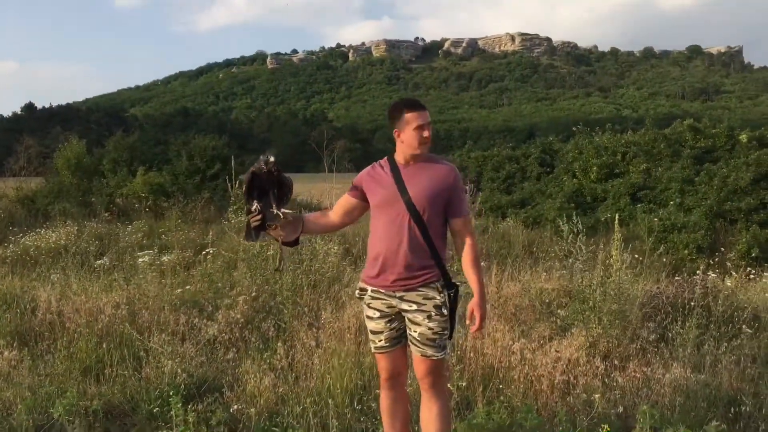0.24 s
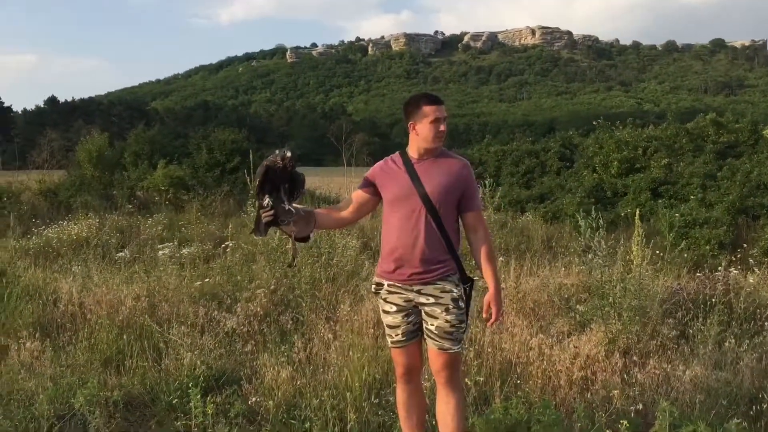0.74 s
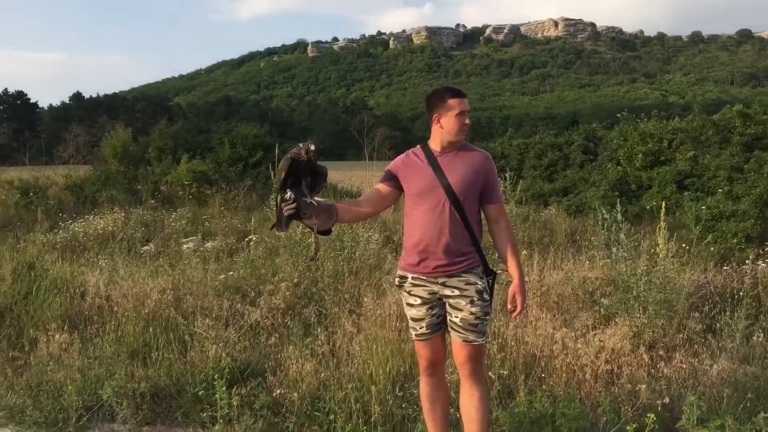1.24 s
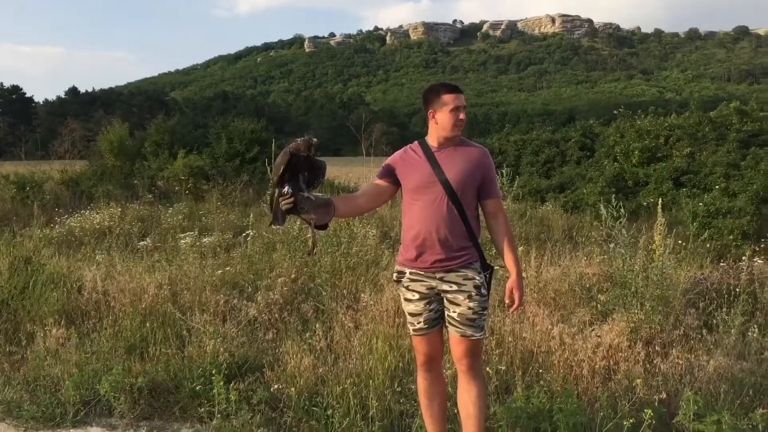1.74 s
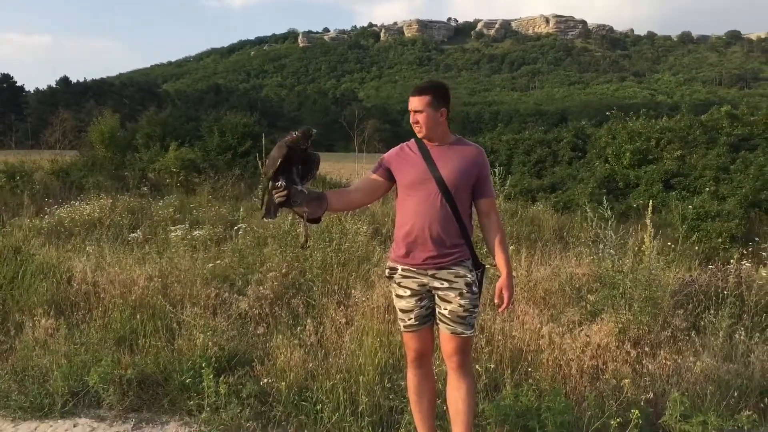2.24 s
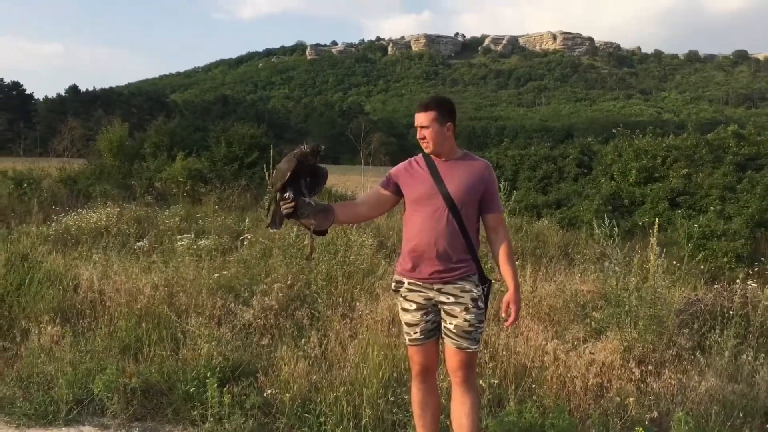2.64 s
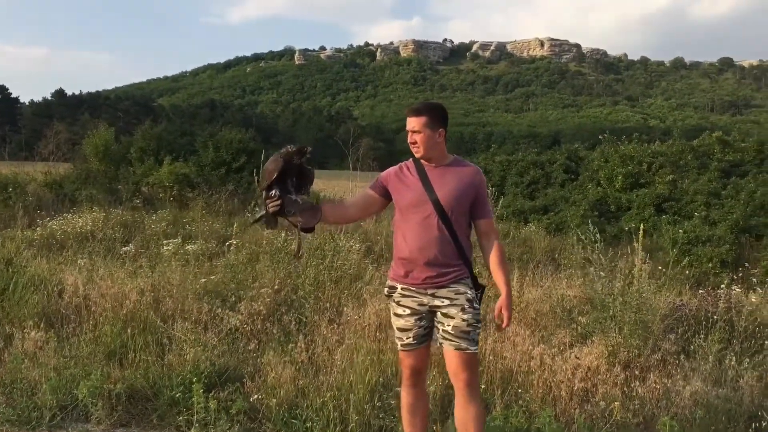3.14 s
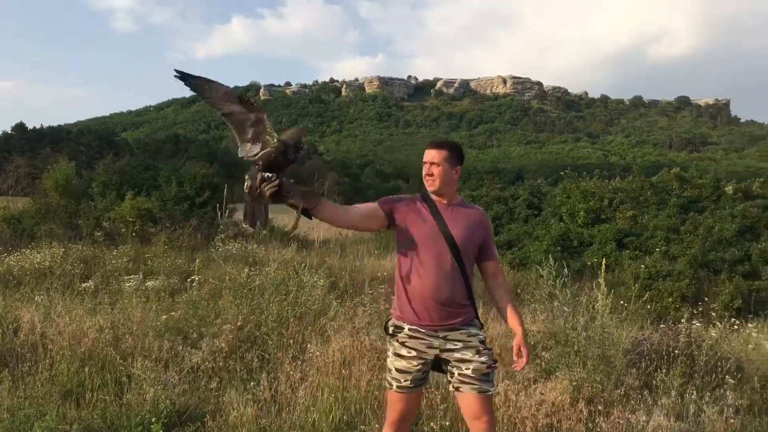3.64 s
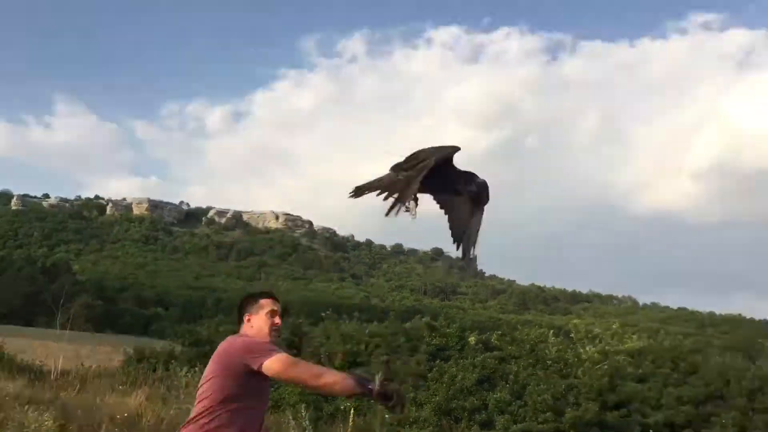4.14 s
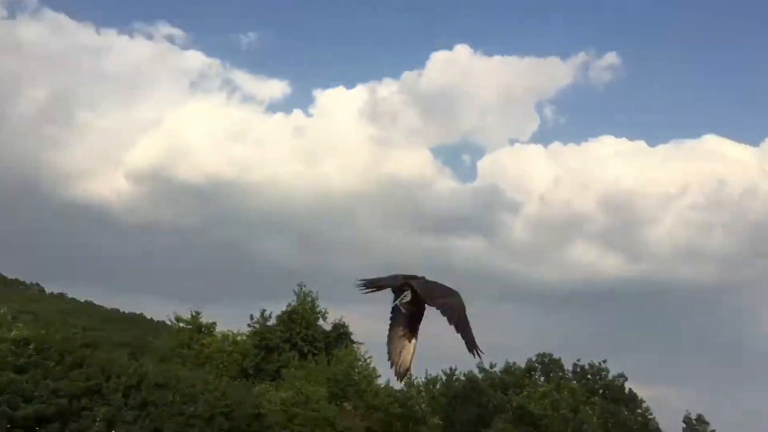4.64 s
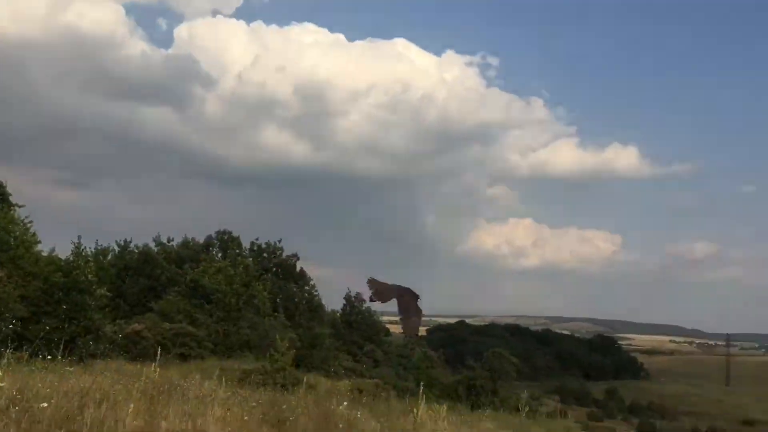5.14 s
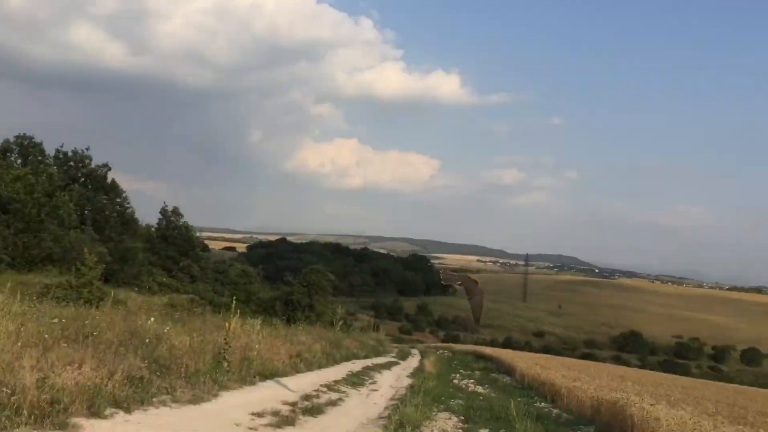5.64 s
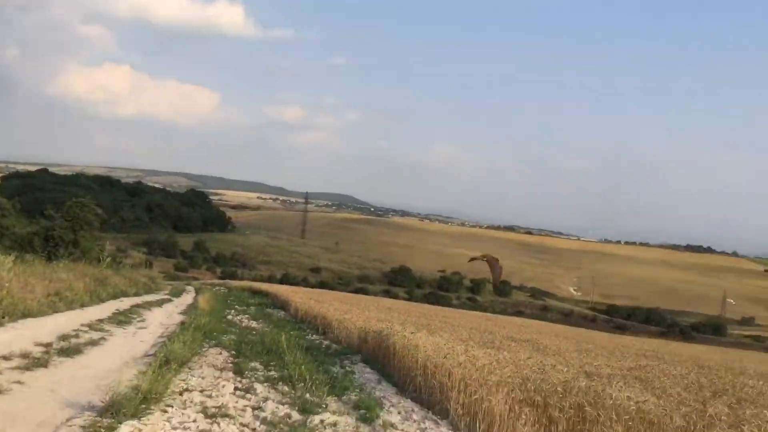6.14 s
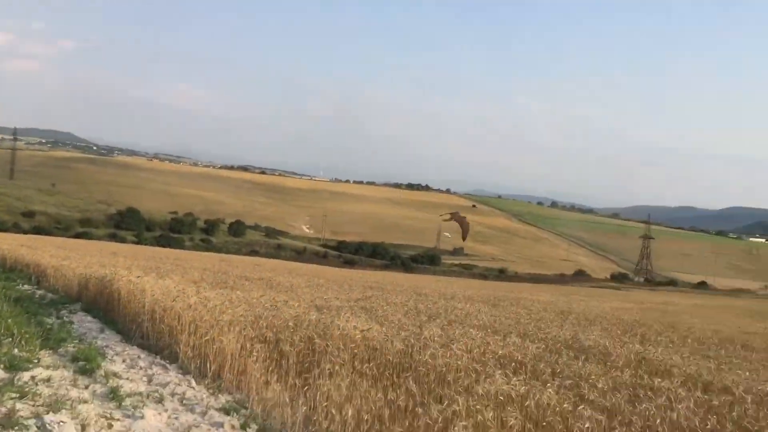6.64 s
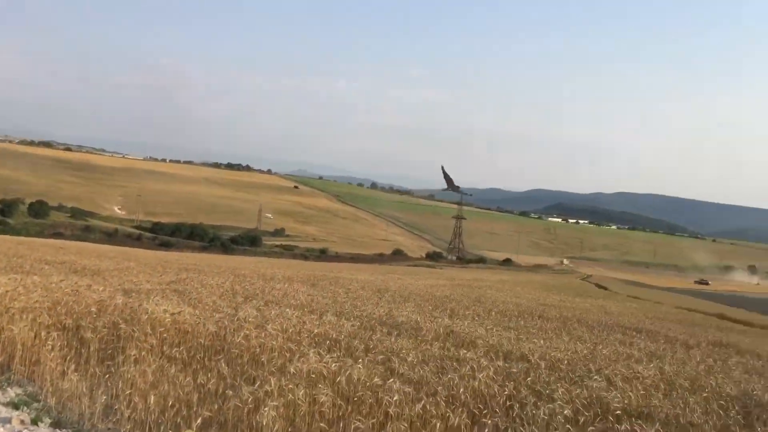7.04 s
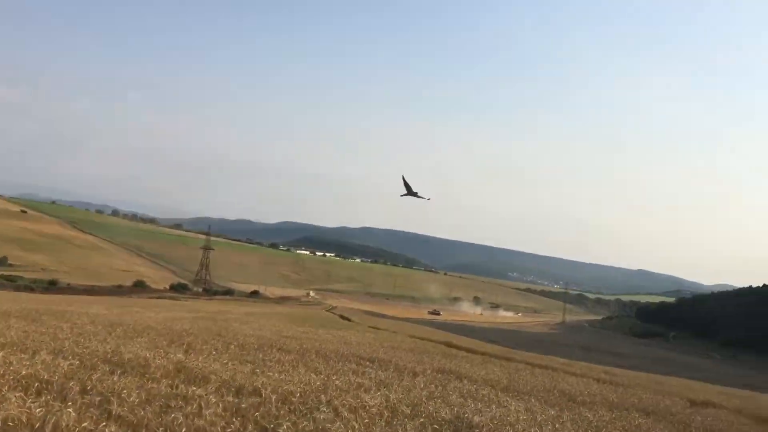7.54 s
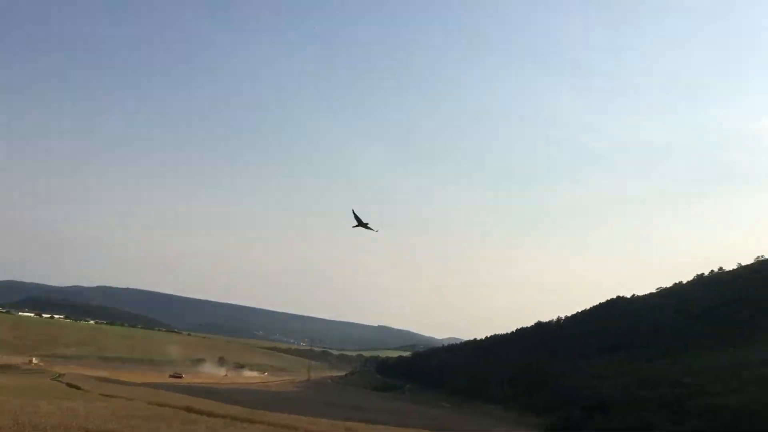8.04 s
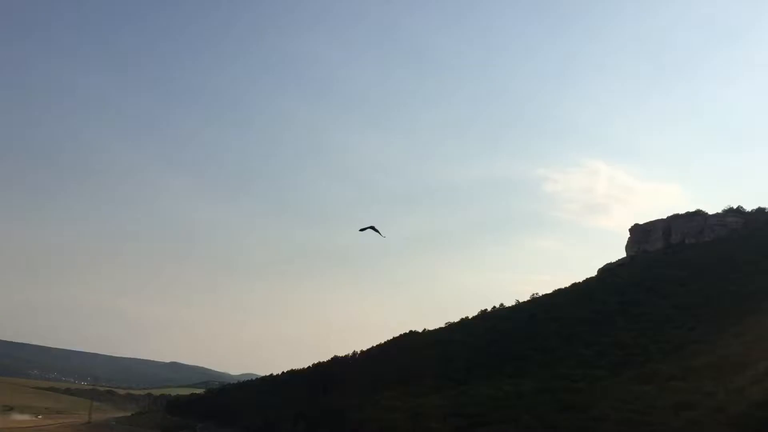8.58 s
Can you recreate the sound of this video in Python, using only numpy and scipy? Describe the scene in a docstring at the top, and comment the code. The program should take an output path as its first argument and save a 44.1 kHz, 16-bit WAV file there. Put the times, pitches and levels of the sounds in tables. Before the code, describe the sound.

A mono handheld microphone in an open grassy field. From 0 to 2.3 s it is quiet: faint air, soft wind puffs and low thumps, with tiny bird chirps around 0.4 and 1.8 s. At 2.3 s a young falcon on the glove gives a weak, rising reedy wail, then short begging cries about every 0.3 s, louder and rougher. Between 3.5 and 4.7 s they flutter and crack into piercing squeals and rasping screams. Takeoff around 4 s brings a sharp dry click and feathery brushes. The cries pass by and run until 5.9 s, with a faint scattered echo from scrub; one distant cry follows at 6.8 s. Wind rumbles strongly from 4.6 s, thumping hardest around 6.5 to 7.3 s, then eases. Sparse clicks get softer, a tiny chirp sounds at 7.9 s, and dry stalk hiss and a far harvester's low drone remain until 8.8 s.

```python
"""A young falcon begs from a falconer's glove in an open field, takes off past the microphone and flies away.
Its voice is a stack of harmonics: reedy wails, most of them rising, that flutter, break into squeals and turn
to rasping screams. Scrub answers with a faint echo, made of fading noise.
Wind is rumbling noise and short pressure kicks. Clicks and brushes of wings and dry grass are bursts of noise.
Small birds are gliding tones; a far harvester is noise with a low, unsteady drone, over hissing stalks and air."""
import sys
import numpy as np
from scipy import signal
from scipy.fft import rfft, irfft
from scipy.io import wavfile

SR = 44100
rng = np.random.default_rng(int(sys.argv[2]) if len(sys.argv) > 2 else 0)


def wrap_up_sound(samples):
    """Save the sound to the file named by the first command line argument, as 16-bit audio."""
    columns = np.atleast_2d(samples).T
    # keep every value between -1 and 1, then stretch to whole-number steps
    tamed = np.clip(columns, -1, 1)
    steps = np.round(tamed * 32767).astype(np.int16)
    wavfile.write(sys.argv[1], SR, steps)


N = 388521
T = np.arange(N) / SR  # time of every sample, s

# Calls: most rise to the break and some fall to it; there the voice turns harder and rougher, then droops.
# (start t/s, break t/s, end t/s, opening f/Hz, break f/Hz [before the small drop there], closing f/Hz,
#  droop power [1 straight, more is later], opening level/dB, pushed level/dB,
#  then levels against the second harmonic: fundamental level/dB, third harmonic level/dB,
#  upper harmonics level/dB; attack t/s, release t/s, opening rasp [0-1], closing rasp [0-1], flutter [0-1])
CALLS = [ (2.341, 2.71, 2.762, 900, 1186, 985, 3.7, -41, -39.5, 0.5, 5, -5, 0.063, 0.023, 0.015, 0.24, .15),
         (2.85, 2.979, 3.093, 1106, 1192, 1064, 5.6, -34, -24.5, -12, -4, -6, 0.0081, 0.02, 0.026, 0.051, 0.08),
         (3.181, 3.271, 3.415, 1134, 1194, 1145, 5, -38.5, -22, -8, -5, -6.5, 0.012, 0.029, 0.06, .15, 0.63),
         (3.503, 3.666, 3.724, 1225, 1271, 1123, 2.16, -34.5, -23.5, -2.5, -1, -9.5, 0.026, 0.021, 0.22, 0.54, 0.79),
         (3.879, 3.984, 4.062, 1340, 1528, 1167, 0.87, -27.5, -23, -1.5, 1.5, -5, 0.011, .055, 0.78, 0.74, 1),
         (4.159, 4.255, 4.299, 1485, 1385, 1118, 0.98, -25, -20.5, -7, -2.5, -7.5, 0.029, 0.019, 0.85, 0.42, .7),
         (4.464, 4.527, 4.584, 1289, 1252, 1084, 1.3, -28, -26, -8, -7, -11.5, 0.006, 0.049, 0.42, 1, 1),
         (4.661, 4.761, 4.836, 1112, 1200, 1124, 2.5, -36.5, -21.5, -4, -1.5, -6, 0.031, 0.06, 0.5, 0.22, 0.69),
         (4.901, 5.014, 5.104, 1153, 1193, 1047, 4.7, -30, -18, -6, -6.5, -8, .035, 0.1, 0.066, 0.58, 0.92),
         (5.192, 5.246, 5.364, 1127, 1220, 1060, 7.4, -38.5, -25, -5, -6.5, -10.5, 0.028, 0.041, 0.25, 0.15, 0.39),
         (5.441, 5.562, 5.618, 1152, 1221, 1124, 2.35, -28.5, -25, -12, -8.5, -7.5, 0.049, .06, 0.1, 0.885, 0.99),
         (5.769, 5.791, 5.890, 1250, 1223, 1049, 2.63, -38, -33, -3.5, -5, -6, 0.013, 0.057, 0.27, 0.39, 0.87),
         (6.768, 6.831, 6.920, 1159, 1188, 1052, 1.2, -50.5, -39.5, -9.5, -1.5, -5.5, 0.023, 0.073, 0.39, 0.33, .3),
         ]
# Moments when the voice breaks into a whistle.
# (start t/s, length t/s, opening f/Hz, middle f/Hz, closing f/Hz,
#  opening level/dB, closing level/dB [both before the squeal trim], rasp [0-1])
SQUEAL_NOTES = [ (3.566, 0.065, 3720, 3543, 3486, -19, -18, 0.2),
                (3.616, .064, 2980, 2715, 2446, -16, -22, .3),
                (3.862, 0.02, 4000, 3810, 3740, -31.5, -31.5, 0.7),
                (3.876, 0.08, 3660, 3596, 3700, -16, -23, 0.24),
                (3.880, 0.093, 2760, 2793, 3137, -30, -19, 0.52),
                (3.953, 0.059, 3740, 3780, 3100, -22.5, -16, 0.73),
                (4.173, .032, 3950, 3703, 3490, -27, -18, 0.66),
                (4.199, 0.059, 2910, 2848, 2780, -9, -25.5, .25),
                (4.425, 0.071, 5110, 4730, 4570, -35.5, -30, 0.33),
                (4.465, 0.063, 2628, 2523, 2510, -23, -24, 0.43),
                (4.467, 0.056, 3170, 3247, 3340, -24, -19.5, .2),
                (4.696, 0.066, 3330, 3320, 3160, -25, -21.5, 0.22), ]


def falcon(squeal_trim_db=-1, cutoff_hz=800):
    """All the calls, with their breaks; little sounds below the cutoff."""
    out = np.zeros(N)
    for call in CALLS:
        add(out, call[0], wail(call))
    for note in SQUEAL_NOTES:
        add(out, note[0], undb(squeal_trim_db) * squeal(note))
    return high_pass(out, cutoff_hz, order=5)


AWAY_S = 4.3, 4.8  # the bird passes the microphone and shows its back between these times
APPROACH_POWER = 1.2  # the pitch eases towards the break
SCOOP, SCOOP_S = .07, .014  # share of the pitch missing at the start, and how fast it is made up
BREAK_DROP, BREAK_S = .017, .008  # share of the pitch lost at the break, and how long the break takes
BREAK_SHARE = 0.41  # this share of the change in rasp and flutter sets in at the break itself
ATTACK_DB, RELEASE_DB = 18.5, 25  # a call starts and ends this far down
ACCENT_DB, ACCENT_S = 5.5, 0.021  # a call opens with a short burst of pressure
# the push starts before the break, jumps at it (more in a rough call), is full this far into the droop
SWELL_LEAD_S, SWELL_JUMP, SWELL_SHARE = .025, 0.16, .45
FUNDAMENTAL_GROWTH = 0.6  # dB gained by the fundamental per dB of push
LATE_PUSH_DB = 5  # extra second harmonic after the break in a fully rasping voice
THROAT_DAMP = .6  # rasp smears the throat's resonances: share of their depth lost at full rasp
WAVER_DB, WAVER_HZ = 2, 18  # the second harmonic wavers once the bird is in flight
OPEN_DB, OPEN_S = 10, .045  # upper harmonics start up to this much weaker (less in a rough call), then catch up
START_BRIGHT_DB, PUSH_BRIGHT_DB, AWAY_DULL_DB = 0.6, 0.22, 1.6  # tilt of the upper harmonics, dB per kHz
# How far the three lowest harmonics give way while the voice squeals.
# (fundamental level/dB, second harmonic level/dB, third harmonic level/dB)
SQUEAL_DUCKING = (-19.5, -7.5, -13.5)
# Resonances of the throat, acting on the three lowest harmonics. (f/Hz, level/dB)
THROAT_COLOUR = [(800, 1), (980, 4.5), (1130, 1), (1300, 0.5), (1650, -2.5), (1850, -4.5), (2090, -11),
                 (2190, -11), (2265, 3.5), (2345, 5.5), (2450, 0), (2560, 2.5), (2680, 8.5), (2900, -14.5),
                 (3080, -20.5), (3240, -8), (3360, 7), (3450, 3), (3530, -7), (3700, -0.5), (4600, -13)]


def wail(call):
    """One call: the pitch scoops in, glides to the break and droops as the bird pushes and its voice roughens."""
    (start, crack, end, open_hz, break_hz, close_hz, droop, open_db, push_db,
     fundamental_db, third_db, upper_db, attack, release, open_rasp, close_rasp, flutter) = call
    t, gate = span(start, end - start, 0.0081)
    early = ramp(t, start, crack)
    late = ramp(t, crack, end)
    broken = ramp(t, crack, crack + BREAK_S)
    away = ramp(t, *AWAY_S)

    # pitch
    hz = break_hz + (open_hz - break_hz) * (1 - early) ** APPROACH_POWER
    hz = hz + (close_hz - break_hz) * late ** droop
    hz = hz * (1 - SCOOP * np.exp((start - t) / SCOOP_S) - BREAK_DROP * broken)

    # loudness: attack, hold, release, opening burst and swell
    held_db = open_db - ATTACK_DB * (1 - ramp(t, start, start + attack))
    held_db = held_db - RELEASE_DB * ramp(t, end - release, end) ** 1.4
    held_db = held_db + ACCENT_DB * np.exp((start - t) / ACCENT_S)
    jump = min(SWELL_JUMP + open_rasp, 1)
    swell = ramp(t, crack - SWELL_LEAD_S, crack + SWELL_SHARE * (end - crack))
    swell_db = (push_db - open_db) * (jump * broken + (1 - jump) * swell)
    pushed_db = held_db + swell_db

    # roughness
    strain = BREAK_SHARE * broken + (1 - BREAK_SHARE) * late
    rasp = open_rasp + (close_rasp - open_rasp) * strain

    # the throat shapes the three low harmonics
    source_db = [held_db + fundamental_db + FUNDAMENTAL_GROWTH * swell_db,
                 pushed_db + LATE_PUSH_DB * rasp * broken,
                 pushed_db + third_db]
    whistle = squealing(t)
    depth = 1 - THROAT_DAMP * rasp
    low_sizes = []
    for k, (db, duck_db) in enumerate(zip(source_db, SQUEAL_DUCKING), 1):
        low_sizes.append(undb(db + duck_db * whistle) * colour(THROAT_COLOUR, k * hz) ** depth)
    low_sizes[1] = low_sizes[1] * undb(WAVER_DB * away * wobble(t, WAVER_HZ))

    # the upper harmonics open up with effort
    closed_db = OPEN_DB * (1 - open_rasp) * np.exp((start - t) / OPEN_S)
    upper_size = undb(pushed_db + upper_db - closed_db)
    dull_db = AWAY_DULL_DB * away - START_BRIGHT_DB * (1 - early) - PUSH_BRIGHT_DB * early
    return gate * syrinx(t, hz, low_sizes, upper_size, dull_db, rasp, flutter * np.maximum(strain, open_rasp))


# Colour of the upper harmonics in the open beak. (f/Hz, level/dB)
BEAK_COLOUR = [(4000, 15.5), (4700, -5), (5800, 0), (7000, -15.5), (8200, -17), (9300, -21), (10500, -26.5),
               (12000, -26.5), (14000, -29.5), (16000, -37.5)]


def syrinx(t, hz, low_sizes, upper_size, dull_db, rasp, flutter, flutter_hz=190, jitter=0.046,
           scatter=0.12, shimmer_db=6, hiss_db=-11):
    """The bird's voice organ buzzes in harmonics; strain adds a slow second vibration and random unevenness."""
    # the second vibration speeds up and stumbles as the voice tears
    speed_up = rasp ** 2 * (1 + .5 * wobble(t, 90))
    beat = turn(flutter_hz * (1 + speed_up + 0.046 * wobble(t, 55)))
    uneven_hz = hz * (1 + jitter * rasp * wobble(t, 160) + 0.03 * rasp * wobble(t, 30))
    phase = turn(uneven_hz) + scatter * rasp * wobble(t, 490) + 0.27 * flutter * np.sin(beat)

    harmonics = []
    for k in range(1, 16):
        shimmer = undb(shimmer_db * rasp * (np.tanh(wobble(t, 150)) - rasp / 4))
        harmonics.append(np.sin(k * phase) * shimmer * (k * hz < SR / 2))
    low = sum(size * h for size, h in zip(low_sizes, harmonics))

    # the beak colours the upper harmonics; each wavers in strength by chance, and all tilt by dull_db per kHz
    gains = []
    for k in range(4, 16):
        gains.append(colour(BEAK_COLOUR, k * hz) * undb(3.9 * wobble(t, 23) - dull_db * k * hz / 1000))
    gains = np.array(gains)
    upper = np.sum(gains * harmonics[3:], axis=0) / np.sqrt(np.sum(gains ** 2, axis=0))

    # air hisses through the membranes once a cycle
    breath = resonate(resonate(rng.standard_normal(len(t)), 5200, 0.98), 5200, 0.98)
    hiss = unit(breath) * (1 + 0.95 * np.cos(phase))
    voice = low + upper_size * (upper + undb(hiss_db) * rasp * hiss)
    return np.sqrt(2) * voice * (1 + 0.38 * flutter * np.sin(beat))


SQUEAL_EDGE_S = 0.0064  # fade at each end of a squeal


def squeal(note, jitter=0.038, shimmer=0.86, octave_db=-21, twelfth_db=-31):
    """The voice breaks into a high, gliding, nearly pure whistle, which tears under strain."""
    start, length, *pitches, open_db, close_db, rasp = note
    t, gate = span(start, length, SQUEAL_EDGE_S)
    db = np.linspace(open_db, close_db, len(t))
    phase = turn(arc(t, pitches) * (1 + jitter * rasp * wobble(t, 140)))
    tone = np.sin(phase)
    tone = tone + undb(octave_db + 5.2 * wobble(t, 60.3)) * np.sin(2 * phase)
    tone = tone + undb(twelfth_db) * np.sin(3 * phase)
    return np.sqrt(2) * gate * undb(db) * tone * (1 + shimmer * rasp * wobble(t, 420))


def squealing(t):
    """1 while the voice is broken into a whistle, else 0, with short slopes between."""
    on = 0
    for start, length, *_ in SQUEAL_NOTES:
        end = start + length
        on = on + ramp(t, start - SQUEAL_EDGE_S, start) - ramp(t, end, end + SQUEAL_EDGE_S)
    return np.minimum(on, 1)


def scrub(x, near_db=-37, far_db=-26, ground_db=-17, t60=.55):
    """Rough ground scatters a quick echo and bushes a longer one; their share grows as the bird leaves."""
    t = T[:SR]
    # t60: seconds for the bushes' echo to fade by 60 dB
    bushes = resonate(rng.standard_normal(len(t)), 3000, 0.72) * undb(-60 * t / t60) * np.minimum(t / 0.04, 1)
    ground = rng.standard_normal(len(t)) * t * np.exp(-t / 0.006)
    # ground_db is reached when the bird is far
    echo = (unit(bushes) + undb(ground_db - far_db) * unit(ground)) / np.sqrt(len(t))
    share_db = np.interp(T, [4.2, 5.6], [near_db, far_db])
    return signal.fftconvolve(x * undb(share_db), echo)[:N]


# Steady wind on the microphone, stronger once it swings after the bird. (t/s, level/dB before the wind trim)
WIND_STRENGTH = [(0, -61.5), (.4, -48.5), (.85, -54), (1.0, -45.5), (1.95, -44), (2.2, -62.5),
                 (2.45, -48.5), (3.1, -56), (4.1, -46), (4.58, -22), (4.9, -32.5), (5.25, -26.5),
                 (5.75, -30.5), (6.05, -39.5), (6.45, -34.5), (6.56, -23.5), (7.22, -26.5), (7.7, -33.5),
                 (8.2, -42), (8.8, -39.5)]
# Colour of the wind's rumble. (f/Hz, level/dB)
RUMBLE_COLOUR = [(15, -47), (25, -15.5), (45, 4.5), (64, 6), (140, -4.5), (286, -25), (489, -33.5),
                 (800, -43.5), (1040, -78.5), (1760, -120)]
# Single gusts. (middle t/s, level/dB before the wind trim, width t/s [standard deviation])
SINGLE_GUSTS = [(0.273, -27, 0.018), (0.631, -33.5, 0.041), (1.318, -27, 0.0067), (1.573, -23.5, 0.023),
                (1.829, -27, 0.02), (2.623, -30, 0.041), (3.212, -37, 0.0096)]
PORT_HZ = 47  # wind sounds are weakened below this


def wind(trim_db=-3, churn_db=3.0, eddy_db=-3, eddy_hz=104, size_db=4.5):
    """Churning rumble and a stream of small eddies (swirls of air) follow the strength of the wind."""
    steady_db, = curves(WIND_STRENGTH, T)
    force = undb(steady_db)
    for s, db, width in SINGLE_GUSTS:
        force = force + undb(db) * np.exp(-.5 * ((T - s) / width) ** 2)
    eddies = np.zeros(N)
    for s, pitch, size in rng.random((350, 3)):
        # random time, a pitch within an octave either way, and few large sizes
        gain = undb(size_db * min(-np.log(size), 3))
        add(eddies, s * T[-1], gain * eddy(eddy_hz * 2 ** (2 * pitch - 1)))
    rumble = unit(noise(RUMBLE_COLOUR) * undb(churn_db * wobble(T, 25)))
    out = undb(trim_db) * force * (rumble + undb(eddy_db) * unit(eddies))
    return high_pass(out, PORT_HZ, order=3)


# Large single eddies that thump the microphone. (t/s, level/dB before trim, f/Hz [the kick glides around it])
THUMPS = [(0.272, -31, 89), (0.599, -18.5, 138), (1.298, -20.5, 69), (1.553, -13, 82.6),
          (1.801, -21.5, 109), (1.827, -16.5, 159), (1.872, -14.5, 111), (2.652, -14, 107),
          (4.799, -15.5, 192), (5.192, -11.5, 76), (5.801, -17.5, 102), (6.531, -13.5, 167.3),
          (6.545, -10.5, 74.3), (6.786, -14.5, 71.5), (6.859, -14.5, 141), (7.111, -25, 162),
          (7.24, -15, 95), (7.284, -13.5, 167)]


def buffets(trim_db=-1):
    """Each large eddy thumps the microphone's diaphragm with one pressure kick."""
    out = np.zeros(N)
    for s, db, hz in THUMPS:
        add(out, s, undb(db + trim_db) * eddy(hz))
    return high_pass(out, PORT_HZ, order=3)


def eddy(hz, cycles=0.46, softness=1.5):
    """The pressure kick of one eddy, slowing as it passes."""
    age = T[:SR // 10] * hz / cycles
    swing = np.sin(turn(hz * (0.48 + 1.785 * np.exp(-age))))
    return swing * (age * np.exp(1 - age)) ** softness


# Brushes of feathers and grass. (middle t/s, length t/s, level/dB before the fades, centre f/Hz)
BRUSHES = [(3.791, 0.02, -42.5, 1890), (4.083, 0.091, -48, 2100), (4.127, 0.03, -41.5, 1870),
           (4.348, 0.23, -49.5, 1800), (6.21, 0.44, -65, 14030), (6.239, 0.15, -54, 1900),
           (6.305, 0.0091, -48.5, 10000), (6.325, 0.13, -63.5, 2455), (6.904, 0.053, -47, 2080),
           (7.391, 0.053, -60.5, 2190), (8.016, 0.058, -59, 2500), (8.572, .12, -70, 3250)]


def rustles(q=1.06, grain_db=4):
    """Wings and dry grass brush along: grainy noise through two broad resonances, faded in and out."""
    out = np.zeros(N)
    for s, length, db, hz in BRUSHES:
        t = T[:int(length * SR)]
        grains = rng.standard_normal(len(t)) * undb(grain_db * wobble(t, 350))
        brush = unit(resonate(resonate(grains, hz, q), hz, q))
        add(out, s - length / 2, undb(db) * brush * np.hanning(len(t)))
    return out


# Dry clicks of tackle and stalks. (t/s, peak level/dB, f/Hz)
DRY_CLICKS = [(3.787, -50, 2460), (4.0479, -20, 2210), (4.33, -30.5, 2490), (4.399, -29, 2570),
              (5.3898, -35.5, 2380), (5.421, -36.5, 2320), (5.8911, -31, 2130), (6.194, -34, 2140),
              (6.9485, -44, 1770), (6.994, -37, 2880), (7.3752, -46.5, 1560), (7.43, -45, 2360),
              (7.4767, -41, 3100), (7.9804, -48.5, 1660), (8.519, -50.5, 3400), (8.547, -47.5, 3170),
              (8.6273, -48, 1760)]


def clicks(q=3.1, t60=.025):
    """A click is a fast-fading burst of noise through one resonance; the burst drops 60 dB in t60 seconds."""
    out = np.zeros(N)
    t = T[:SR // 20]
    for s, db, hz in DRY_CLICKS:
        snap = resonate(rng.standard_normal(len(t)) * undb(-60 * t / t60), hz, q)
        add(out, s, undb(db) * snap / np.abs(snap).max())
    return out


# Calls of small birds. (t/s, length t/s, opening f/Hz, middle f/Hz, closing f/Hz, peak level/dB)
SMALL_BIRDS = [(.348, .05, 3600, 4100, 3780, -55.5), (.349, 0.036, 3220, 2180, 1720, -60.5),
               (0.517, 0.057, 2780, 2080, 1700, -64), (1.805, 0.039, 3120, 2550, 2030, -61),
               (7.852, 0.029, 4850, 5090, 5230, -52.5)]


def chirps():
    """Each small bird's chirp is one gliding, slightly unsteady tone that swells and fades."""
    out = np.zeros(N)
    for s, length, *pitches, db in SMALL_BIRDS:
        t, gate = span(s, length, length / 2)
        hz = arc(t, pitches) * (1 + 0.014 * wobble(t, 300))
        add(out, s, undb(db) * gate * np.sin(turn(hz)))
    return out


# Loudness of the far harvester's noise, before its small wavering. (t/s, level/dB)
HARVESTER_LEVEL = [(0, -80.5), (5.5, -66.5), (6.8, -65), (7.5, -59.5), (8.1, -56.5), (8.8, -58)]
# Colour of the harvester's noise. (f/Hz, level/dB)
MACHINE_COLOUR = [(150, -44), (250, -14.5), (333, -0.5), (440, -4), (623, 5.5), (680, 1.5), (831, -2),
                  (946, -17), (2000, -45.5), (2600, -56), (4400, -120)]


def harvester(engine_hz=315, engine_db=-13):
    """A far machine: coloured noise plus an unsteady engine tone and its octave."""
    level_db, = curves(HARVESTER_LEVEL, T)
    phase = turn(engine_hz * (1 + 0.013 * wobble(T, 1.8)))
    drone = (np.sin(phase) + np.sin(2 * phase)) * undb(engine_db + 4.1 * wobble(T, 6.6))
    return undb(level_db + wobble(T, 6)) * (noise(MACHINE_COLOUR) + drone)


# Hiss of the dry field, before its small wavering. (t/s, level/dB)
FIELD_LEVEL = [(0, -74.5), (3.5, -72), (5, -62.5), (6.5, -65), (7.9, -64), (8.8, -65.5)]
# Colour of that hiss. (f/Hz, level/dB)
STALK_COLOUR = [(900, 10), (2000, 2), (4000, -7.5), (7000, -10.5), (10500, -8), (13000, -5), (15500, -4)]


def dry_field():
    """Dry stalks hiss: noise whose level wavers a little."""
    level_db, = curves(FIELD_LEVEL, T)
    return undb(level_db + 0.8 * wobble(T, 12)) * noise(STALK_COLOUR)


# Colour of the still air. (f/Hz, level/dB)
AIR_COLOUR = [(120, -22.5), (200, -19.5), (321, 6), (414, -5), (677, -15), (1030, -22), (2250, -16),
              (4920, -22.5), (6130, -21), (14200, -34), (15500, -29.5)]


def still_air(level_db=-68):
    """Still air: soft noise at a constant level."""
    return undb(level_db) * noise(AIR_COLOUR)


def undb(db):
    """Decibels to gain."""
    return 10 ** (np.asarray(db) / 20)


def unit(x):
    """Scale to an rms (average strength) of 1."""
    return x / np.sqrt(np.mean(x ** 2) + 1e-18)


def curves(table, t):
    """The columns of a table at times t, in straight lines between its rows."""
    s, *columns = np.transpose(table)
    return [np.interp(t, s, c) for c in columns]


def colour(points, hz):
    """Gain of a (f/Hz, level/dB) table at the given frequencies."""
    f, db = np.transpose(points)
    return undb(np.interp(np.log(hz + 1), np.log(f), db))


def noise(points):
    """Noise with the given colour, falling away beyond its ends."""
    hz = np.fft.rfftfreq(N, 1 / SR)
    ends = np.minimum(hz / points[0][0], 1) ** 2 / np.maximum(hz / points[-1][0], 1) ** 3
    return unit(irfft(rfft(rng.standard_normal(N)) * colour(points, hz) * ends, N))


def wobble(t, hz):
    """Random motion of rms 1, mostly slower than hz."""
    f = np.fft.rfftfreq(len(t), 1 / SR)
    return unit(irfft(rfft(rng.standard_normal(len(t))) / np.sqrt(1 + (f / hz) ** 4), len(t)))


def resonate(x, hz, q):
    """One resonance at hz; a higher q makes it narrower."""
    hz = min(hz, .4 * SR)
    return signal.lfilter(*signal.iirpeak(hz, max(q, 3 * hz / SR), fs=SR), x)


def high_pass(x, hz, order):
    """Weaken what lies below hz."""
    return signal.sosfilt(signal.butter(order, hz, "high", fs=SR, output="sos"), x)


def turn(hz):
    """Phase of a moving frequency."""
    return 2 * np.pi * np.cumsum(hz) / SR


def span(start, length, edge):
    """Sample times of a note and a gate with soft ends."""
    t = start + np.arange(int(length * SR)) / SR
    return t, np.clip(np.minimum(t - t[0], t[-1] - t) / edge, 0, 1)


def ramp(t, start, end):
    """0 before start, 1 after end, straight between."""
    return np.clip((t - start) / max(end - start, 1 / SR), 0, 1)


def arc(t, pitches):
    """A smooth glide through an opening, a middle and a closing pitch."""
    return np.polyval(np.polyfit([0, .5, 1], pitches, 2), ramp(t, t[0], t[-1]))


def add(out, s, x):
    """Mix x in at time s."""
    i = max(int(s * SR), 0)
    out[i:i + len(x)] += x[:max(N - i, 0)]


def scene():
    """The falcon and its echo over wind, small sounds and the field, in one channel."""
    bird = falcon()
    moving_air = wind() + buffets()
    small_sounds = rustles() + clicks() + chirps()
    countryside = harvester() + dry_field() + still_air()
    return (bird + scrub(bird) + moving_air + small_sounds + countryside)[None]


def record(dry, top_hz=15900):
    """The recorder cuts the treble above top_hz."""
    return signal.sosfilt(signal.ellip(10, .2, 80, top_hz, fs=SR, output="sos"), dry)


dry = scene()
out = record(dry)
wrap_up_sound(out)
```